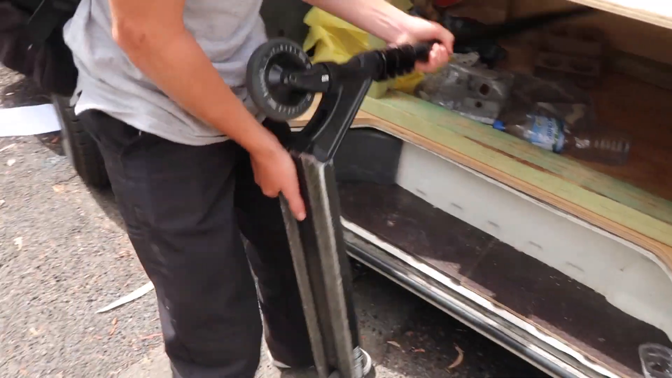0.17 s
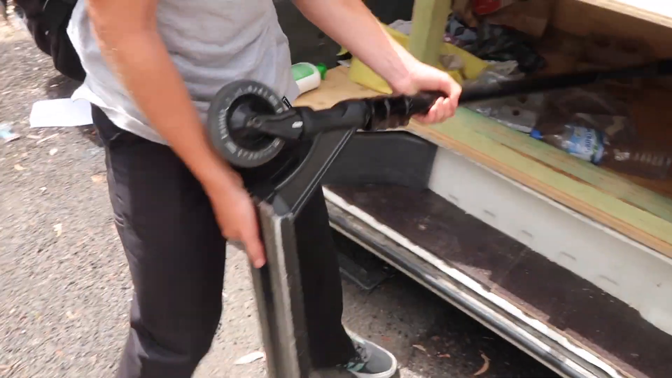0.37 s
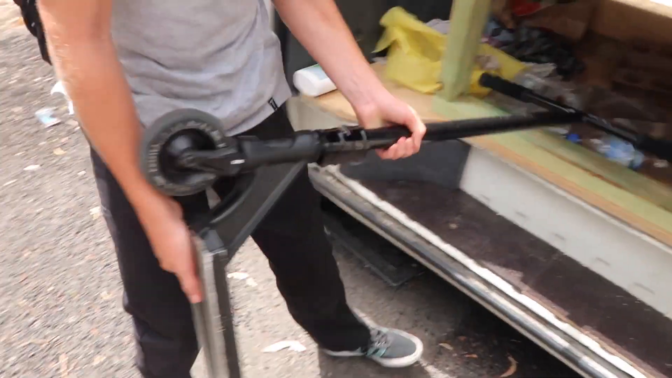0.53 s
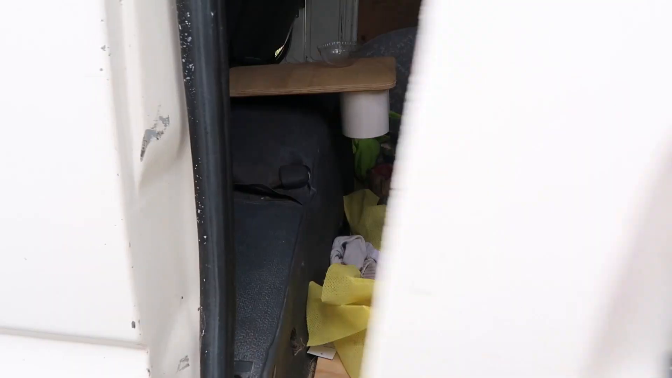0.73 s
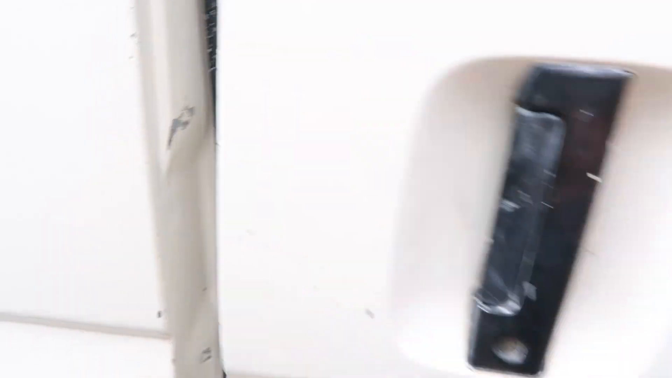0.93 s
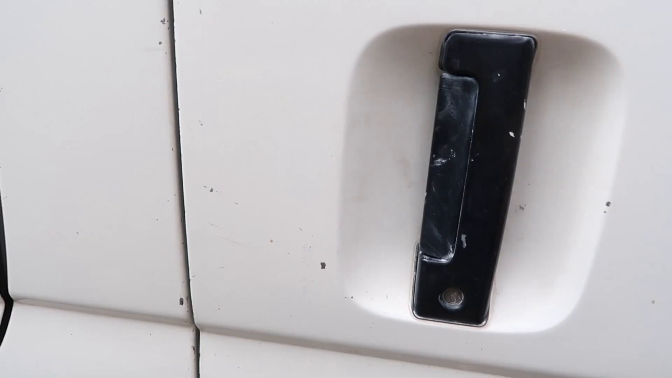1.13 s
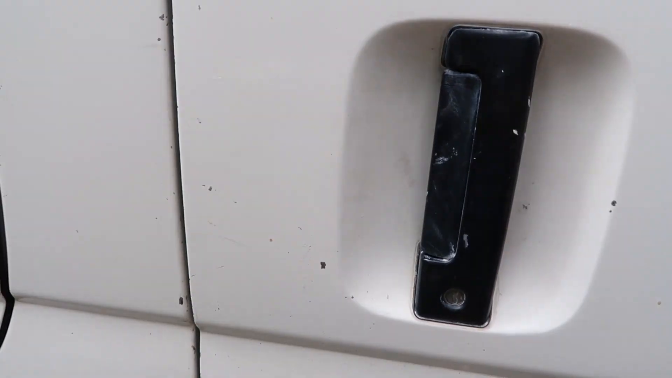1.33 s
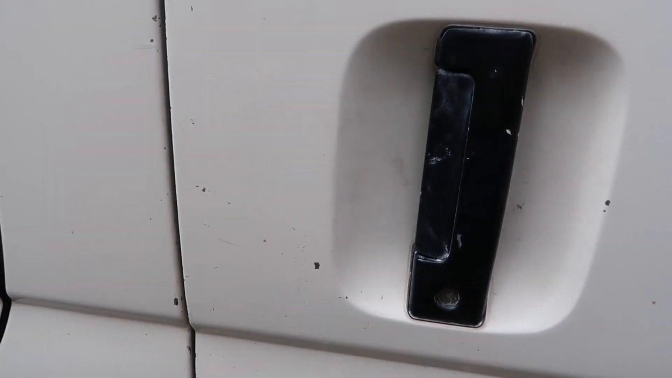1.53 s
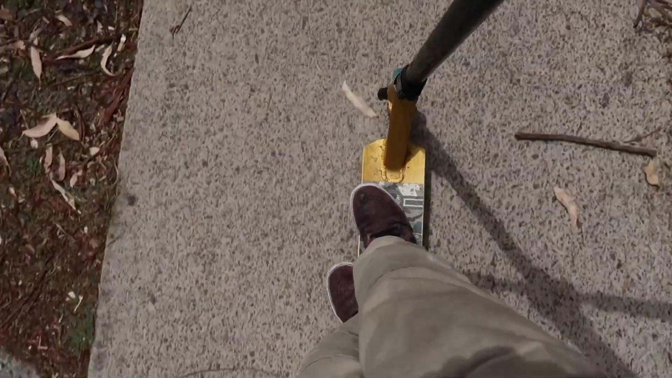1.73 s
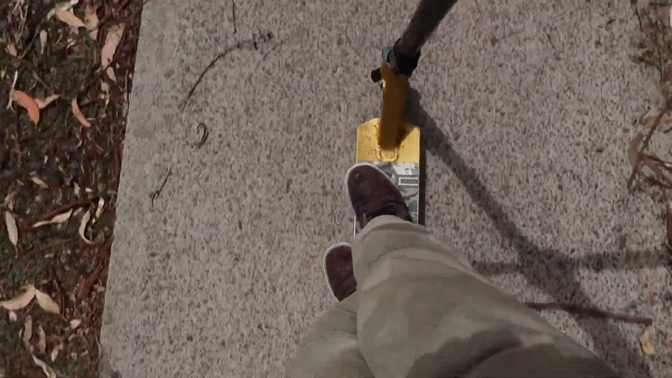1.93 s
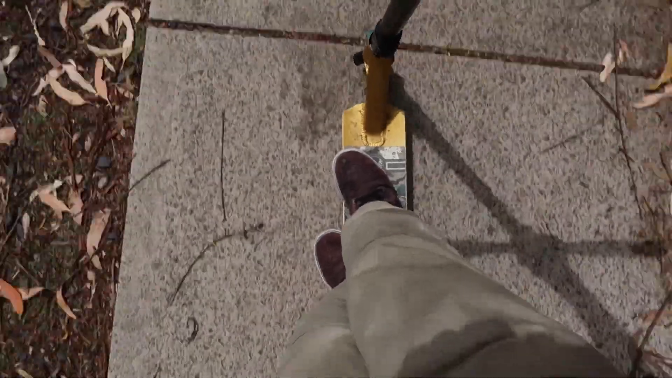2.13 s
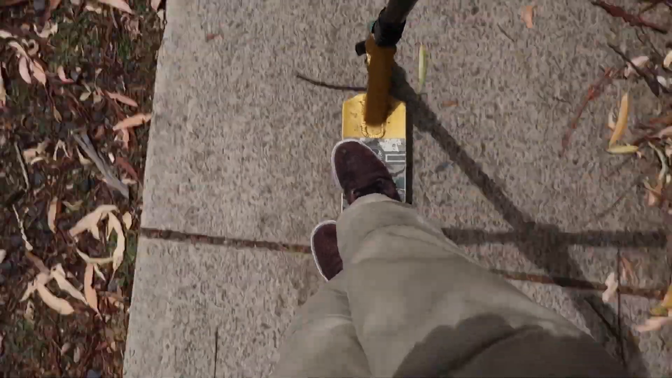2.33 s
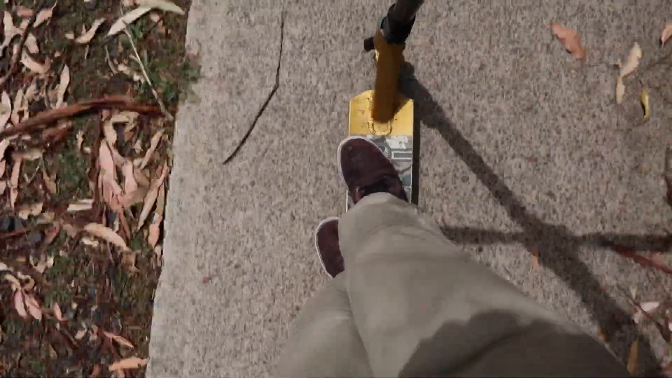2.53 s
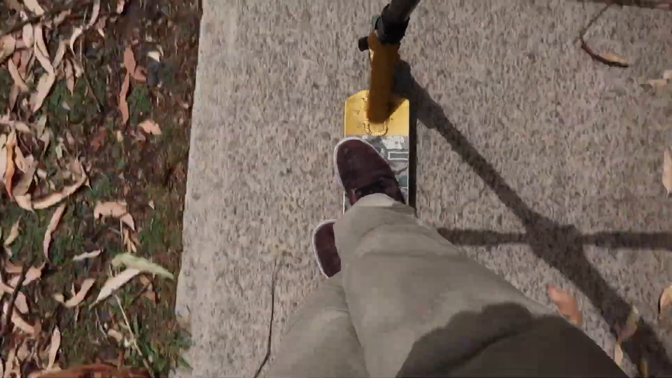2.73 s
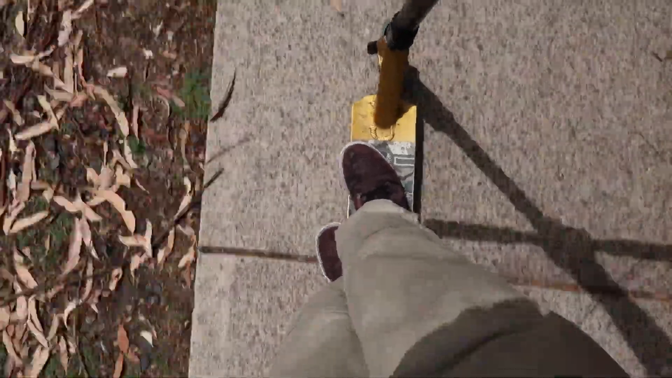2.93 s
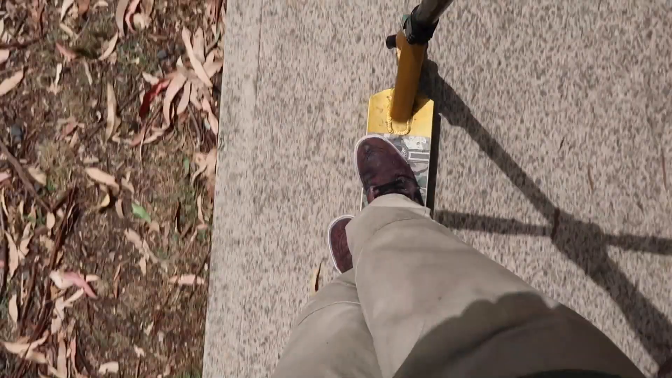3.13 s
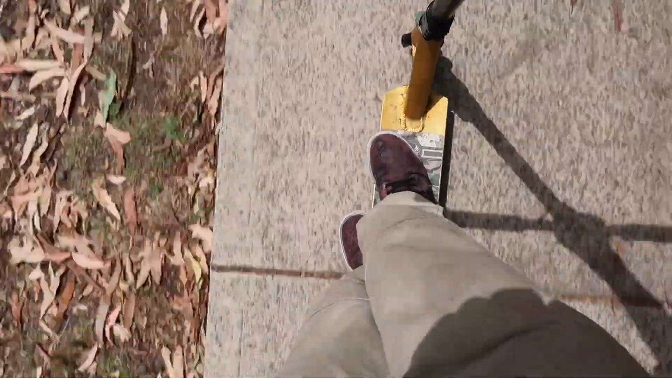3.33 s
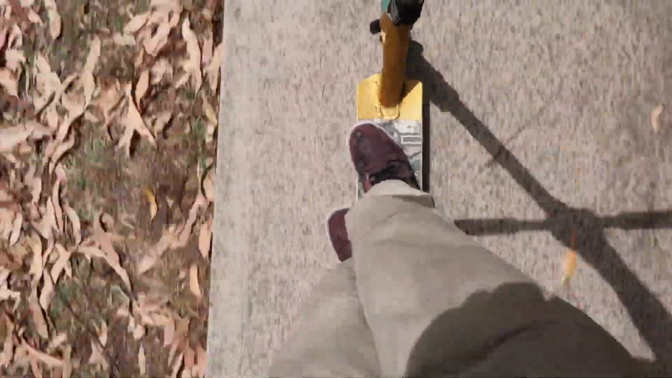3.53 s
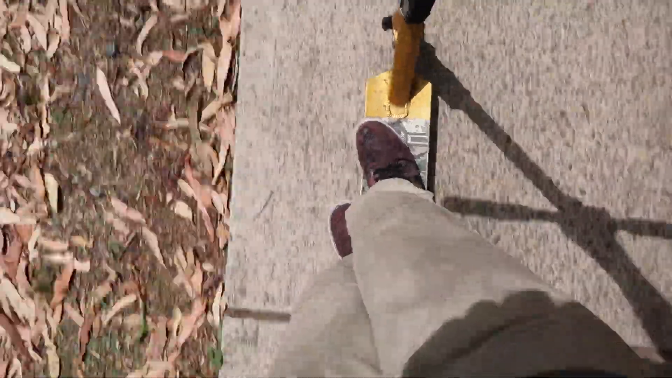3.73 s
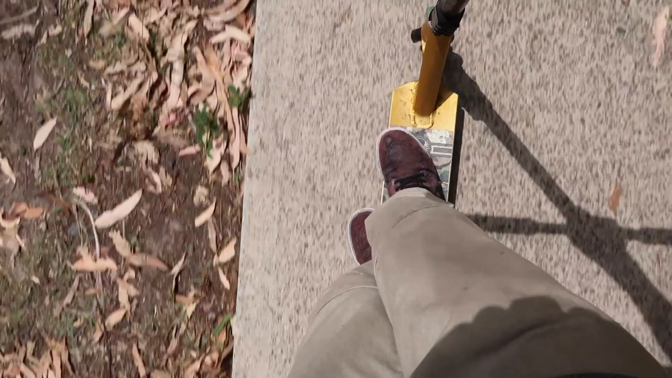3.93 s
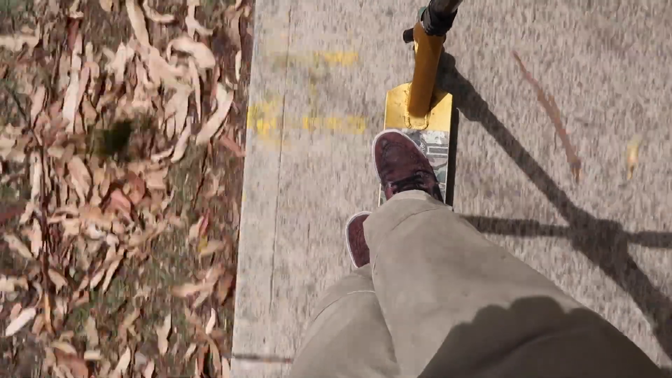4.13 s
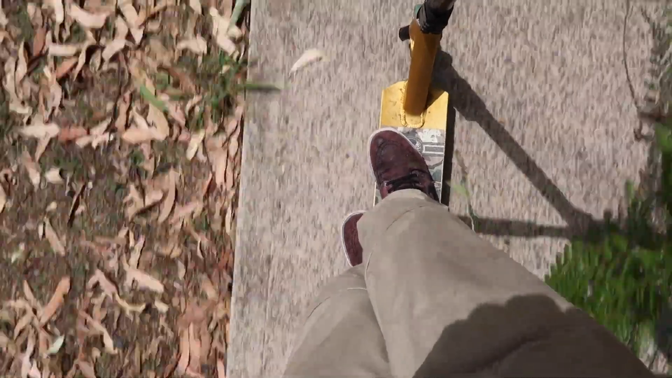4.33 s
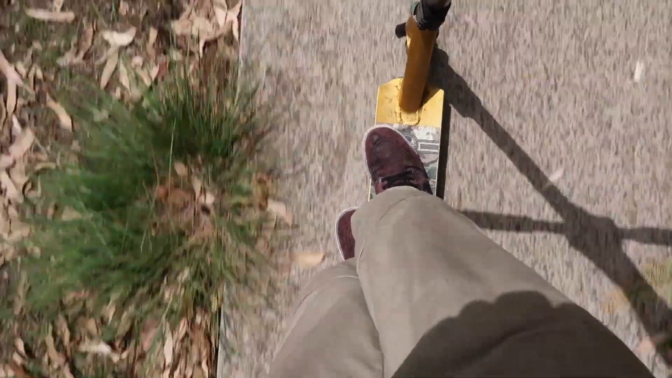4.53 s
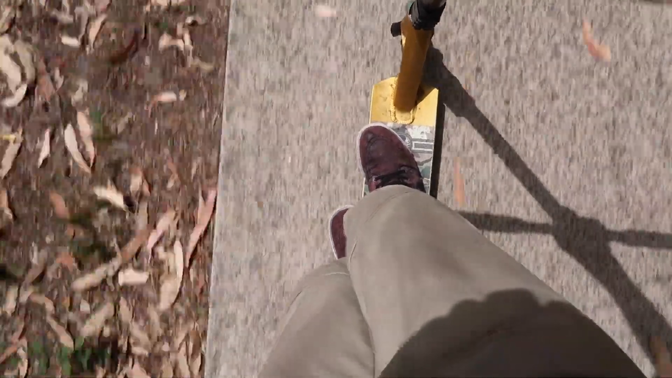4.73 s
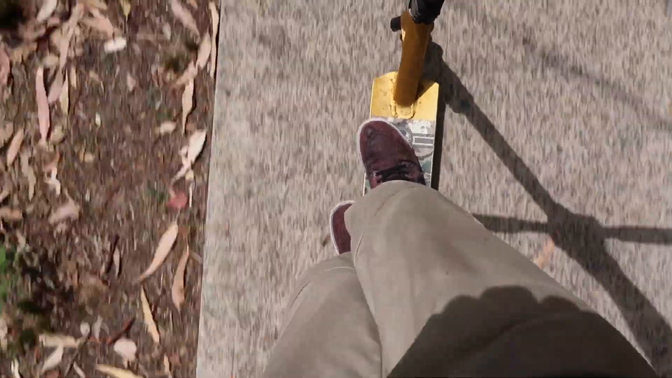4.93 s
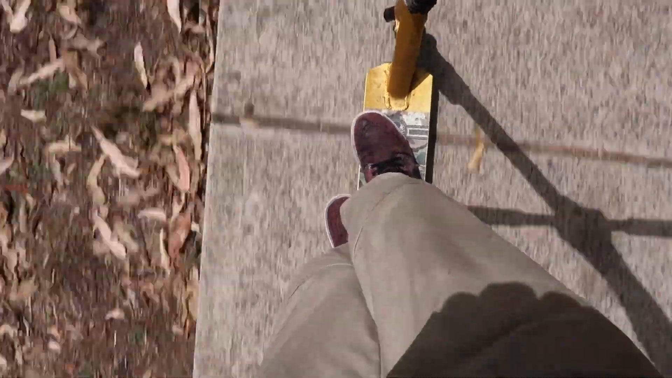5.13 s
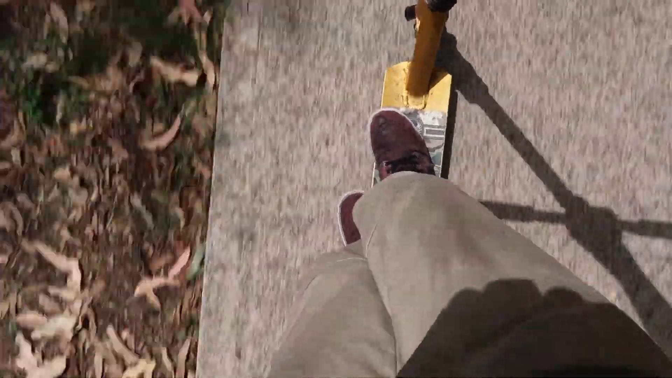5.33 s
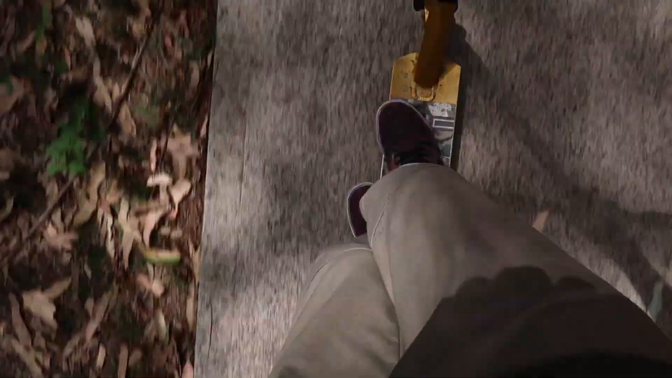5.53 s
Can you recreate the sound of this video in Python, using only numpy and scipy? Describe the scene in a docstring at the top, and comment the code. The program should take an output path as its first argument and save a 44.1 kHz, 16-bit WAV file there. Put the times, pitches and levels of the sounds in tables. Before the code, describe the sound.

Dull handling knocks lead to a quick metal clatter, then a heavy door grinds along its rail, crashes shut and rings briefly. A hard cut brings low, rattling wheel rumble on a path, with grit ticks, early juddering clacks, then spaced bassy thumps. Wind gusts and small motor ticks surround it; the close camera microphones overload slightly on big bumps.

```python
"""Outdoors, clothes rustle in a light breeze beside a ticking lens motor; a kick scooter lifted from a van clanks on it.
The van's sliding door rumbles and groans along its rail and slams: noise through body colours, with ringing modes.
Then the scooter rides down a concrete path: filtered noise drums and hisses, grains tick, pushes thump at the joints
and the deck clacks and judders. Shaking reaches the camera's two microphones through its body, headwind and gusts
buffet them, and the gain control ducks after the loudest peaks."""
import sys
import numpy as np
from scipy import signal
from scipy.fft import rfft, irfft, next_fast_len
from scipy.io import wavfile
from scipy.ndimage import uniform_filter1d

SR = 44100
rng = np.random.default_rng(int(sys.argv[2]) if len(sys.argv) > 2 else 0)


def dump_mix(stems):
    """Bounce the given channels to the path in sys.argv[1] as a 16-bit WAV at rate SR."""
    frames = np.atleast_2d(stems).T  # one column per channel
    limited = np.clip(frames, -1, 1)  # hard clip at full scale
    pcm = np.round(limited * 32767).astype(np.int16)
    wavfile.write(sys.argv[1], SR, pcm)


N = 249606
T = np.arange(N) / SR

# the door starts along its rail, reaches its end, and the ride begins (s)
DOOR_START, SHUT_S, RIDE_START = .725, 1.315, 1.648
# coarse grains, on the path and in the rail: rate, smallest size and spread, before filtering
STONES_PER_S, STONE_DB, STONE_SPREAD_DB = 68, -39, 4

# microphone pair hearing the shaken camera body: hz, left_minus_right_db, left_lead_rad, likeness_0_to_1
SHAKEN = [(40, -.3, 0, 1), (130, -3, -.1, .98), (185, -5.5, .1, .95), (275, -10, .9, .95),
          (410, -10, 1.55, .96), (570, -12.5, 3.3, .92), (710, -13, 3.4, .8), (900, -3.5, 3.3, .9),
          (1250, -3.5, 3.3, .88), (2330, 0, 3.1, .77), (4150, .5, 3.3, .45), (9100, 0, 3.1, .5)]
# the pair hearing airborne sound: hz, left_minus_right_db, left_lead_rad, likeness_0_to_1
AIRBORNE = [(170, 0, 0, 1), (275, -1, -.1, .99), (420, -3.5, -.3, .97), (620, -1, -1.2, .88),
            (1100, -1, -2.4, .85), (2500, 0, -3, .7), (9100, .5, -3.3, .55)]
# treble in the body pushes the pair in opposite directions: hz, left_minus_right_db, left_lead_rad, likeness_0_to_1
OPPOSED = [(1000, 0, np.pi, .88), (4000, 0, np.pi, .75), (9000, 0, np.pi, .7)]
# the ride gathers speed, then coasts: time_s, drumming_db, crunch_db (before the rough patches)
RIDE = [(1.66, -39, -64), (2.1, -31, -63), (2.66, -29.5, -62), (3.16, -26, -55), (4.11, -28, -64),
        (4.49, -30, -63.5), (5.11, -28.5, -60.5), (5.64, -30, -64)]
# resonances of deck, stem and camera body: hz, relative_db
FRAME = [(60, -28), (130, 2.5), (195, -10), (310, 1.5), (365, -5.5), (425, -2), (505, -17), (570, -6),
         (625, -12), (710, -8.5), (870, -27), (1060, -50), (2100, -54.5)]


def amp(db):
    """Decibels to gain."""
    return 10 ** (np.asarray(db) / 20)


def read(points, hz, axis=1):
    """One column of a table over log frequency."""
    points = np.array(points, float)
    return np.interp(np.log(hz + 1), np.log(points[:, 0] + 1), points[:, axis])


def level(curve, axis=1):
    """One dB column of a curve as a gain for every sample."""
    curve = np.array(curve)
    return amp(np.interp(T, curve[:, 0], curve[:, axis]))


def between(start, end):
    """One inside a stretch of time, with short fades."""
    fade_in = np.clip((T - start) * 200 + .5, 0, 1)
    return fade_in * np.clip((end - T) * 200 + .5, 0, 1)


def add(mix, s, sound):
    """Mixes a sound in at a time."""
    part = mix[:, max(round(s * SR), 0):][:, :sound.shape[-1]]
    part += sound[..., :part.shape[1]]


def dying(t, t60):
    """Falls by 60 dB in t60 seconds."""
    return np.exp(-np.log(1000) * t / t60)


def hump(s, half_s):
    """A smooth swell of height one around a time."""
    return np.exp(-np.minimum(((T - s) / half_s) ** 2, 50))


def held(start, end, rise_s, t60):
    """Rises at the start, holds until the end, then dies away."""
    return np.clip((T - start) / rise_s, 0, 1) * dying(np.maximum(T - end, 0), t60)


def wander(per_s):
    """Random drift: straight lines between normal draws of unit spread."""
    knots = rng.standard_normal(4096)
    return np.interp(T * per_s, np.arange(len(knots)), knots)


def colour(x, points, size=4096):
    """Minimum-phase filter of unit energy shaped by a table, rolled off above its last point."""
    hz = abs(np.fft.fftfreq(size, 1 / SR))
    rolloff = (1 + (hz / points[-1][0] / 2) ** 2) ** 2
    log_gain = np.log(amp(read(points, hz)) / rolloff + 1e-6)
    taps = np.fft.ifft(np.exp(np.conj(signal.hilbert(log_gain)))).real[:size // 2]
    return signal.oaconvolve(x, taps[None] / np.linalg.norm(taps), axes=1)[:, :N]


def ports(x, pair):
    """Row 0 reaches both microphones, shifted in level and phase; row 1 is the part that the left hears alone."""
    size = next_fast_len(N + 4096)
    hz, (shared, own) = np.fft.rfftfreq(size, 1 / SR), rfft(x, size)
    like = np.clip(read(pair, hz, axis=3), 0, 1)
    left = like * shared + np.sqrt(1 - like ** 2) * own
    left = left * amp(read(pair, hz)) * np.exp(1j * read(pair, hz, axis=2))
    return irfft(np.array([left, shared]), size)[:, :N]


def scattered(per_s, db, spread_db):
    """Impulses at random moments; a few are large."""
    size_db = db + spread_db * np.minimum(rng.exponential(1, (2, N)), 3)
    return amp(size_db) * (rng.random((2, N)) < per_s / SR)


def texture(points, pair, band, lumpy_db, per_s):
    """Countless tiny contacts as lumpy noise through a body; unit level within the band (Hz)."""
    contacts = rng.standard_normal((2, N)) * amp(lumpy_db * wander(per_s))
    x = ports(colour(contacts, points), pair)
    band_filter = signal.butter(4, band, "band", fs=SR, output="sos")
    return x / signal.sosfilt(band_filter, x.mean(0)).std()


def blows(rows, points, split_hz, rise_s, tail_db, tail_s):
    """Each blow is a swelling, dying burst of contacts plus a weak tail, with its own share of treble."""
    out, t = np.zeros((2, N)), T[:SR // 3]
    for s, db, treble_db, t60 in rows:
        swell = 1 - np.exp(-(t / rise_s) ** 2)
        decay = dying(t, t60) + amp(tail_db) * dying(t, tail_s)
        burst = rng.standard_normal((2, len(t))) * swell * decay
        low = signal.lfilter(*signal.butter(1, split_hz, fs=SR), burst)
        add(out, s - rise_s / 2, amp(db) * (low + amp(treble_db) * (burst - low)))
    return colour(out, points)


def strikes(rows, points):
    """Each contact is one clean impulse through a body; the level is its peak."""
    out = np.zeros((2, N))
    shape = colour(signal.unit_impulse((1, SR // 20)), points)
    for s, db, *_ in rows:
        add(out[:1], s, amp(db) * shape / abs(shape).max())
    return out


def ringing(rows, modes, scatter_db, buzz, detune):
    """Each blow rings the modes in freshly drawn shares and tunings; loose contact makes them buzz."""
    hz, mode_db, t60 = np.transpose(modes)[:, :, None]
    out, t = np.zeros((2, N)), T[:SR // 4]
    fade = amp(mode_db) * dying(t, t60) * (1 - np.exp(-t * hz))
    for s, db, *_ in rows:
        tuning = hz * (1 + detune * rng.standard_normal(hz.shape))
        shares = amp(db + scatter_db * rng.standard_normal((2, len(modes))))
        jitter = uniform_filter1d(rng.standard_normal(fade.shape), size=32, axis=1)
        slip = np.cumsum(jitter, 1) * np.sqrt(buzz * hz / SR)  # the phase drifts smoothly
        add(out, s, shares @ (fade * np.sin(2 * np.pi * tuning * t + slip)))
    return out


def wavering(hz, drift, lumpy_db, per_s):
    """A driven resonance of about unit level whose pitch and strength wander."""
    phase = 2 * np.pi * np.cumsum(hz * (1 + drift * wander(per_s))) / SR
    return np.sqrt(2) * np.sin(phase) * amp(lumpy_db * wander(per_s))


def unloading():
    """Clothes rustle as noise; the scooter knocks in bursts and its metal scrapes and rings on the van."""
    # outdoor air and rustling clothes: time_s, level_db
    yard = [(0.0, -59), (0.492, -62), (0.72, -63)]
    # their colour: hz, relative_db
    yard_colour = [(60, 4.5), (380, -7), (600, -10.5), (900, -9), (1500, -16.5), (2200, -19.5),
                   (2600, -24.5), (3300, -20), (3800, -27.5), (4600, -27.5), (5700, -33), (10000, -40.5),
                   (15000, -50)]
    # the scooter knocks in the hands: time_s, level_db (before the gains below), treble_db, decay_t60_s
    knock_rows = [(.209, -23, 4, 0.046), (.259, -19, -12, 0.062), (.458, -21, 5, 0.21),
                  (.476, -29, -5, 0.043), (.535, -21, 3, 0.13), (.553, -15, 5.5, 0.034)]
    # colour of the knocks: hz, relative_db
    knock_colour = [(80, -13.5), (200, -3), (400, 5), (560, -5), (750, -8.5), (1100, -15.5), (2500, -32),
                    (4300, -35.5), (7000, -66), (14000, -73.5)]
    # metal clatters on the van: time_s, level_db (before the gains below)
    clank_rows = [(.5545, -33.5), (.562, -23), (.5685, -24), (.572, -22.5), (.5795, -22.5), (.5845, -21.5),
                  (.5885, -22.5), (.599, -25.5), (.608, -28.5), (.617, -32.5), (.634, -37.5)]
    # modes of the scooter's metal: hz, relative_db, decay_t60_s
    metal = [(428, -1, .09), (738, 1, .11), (1066, -3, .1), (1427, 1, .1), (1529, -1, .11), (1627, -3, .1),
             (2094, -5, .1), (2194, -9, .1), (2444, -14, .1), (2998, -11, .11), (3461, -14, .13),
             (3760, -14, .12), (3930, -11, .09), (4475, -21, .08), (4915, -20, .08), (5250, -20, .07)]
    # colour of the scraping: hz, relative_db
    clank_colour = [(120, -22.5), (450, -0.5), (700, -5), (1500, -12.5), (2400, -10), (4000, -16.5),
                    (5200, -29), (6500, -28.5), (7500, -64), (14000, -68)]
    air = texture(yard_colour, SHAKEN, (2500, 6000), lumpy_db=2.5, per_s=70)
    air = air * level(yard) * between(-1, DOOR_START)
    knocks = amp(-5.5) * blows(knock_rows, knock_colour, split_hz=370, rise_s=.002, tail_db=-8, tail_s=0.28)
    knocks += amp(3.5) * strikes(knock_rows, knock_colour)
    scrape_rows = [(s, db, 0, .018) for s, db in clank_rows]
    scrape = blows(scrape_rows, clank_colour, split_hz=1500, rise_s=.0006, tail_db=-15, tail_s=0.11)
    ring = ringing(clank_rows, metal, scatter_db=2.5, buzz=.1, detune=.006)
    clanks = amp(1.5) * scrape + amp(-2.5) * strikes(clank_rows, clank_colour) + amp(-5.5) * ring
    return air + ports(knocks, SHAKEN) + ports(clanks, AIRBORNE)


def wind():
    """Low, lumpy buffeting on the microphones: breeze, easing headwind and low swells add in power."""
    # colour of the buffeting: hz, relative_db
    wind_colour = [(12, -37), (26, -22.5), (42, 0), (70, -4), (110, -4), (200, -14), (500, -53.5)]
    # the microphone pair in the wind: hz, left_minus_right_db, left_lead_rad, likeness_0_to_1
    windward = [(30, 0, 0, 1), (150, -1.5, 0, .97)]
    # gusts, the door's puff, and a low handling thud at .448 s: top_s, level_db, half_length_s
    swells = [(.448, -31, .025), (1.285, -29.5, 0.036), (2.25, -23.5, 0.18), (2.568, -27, .065),
              (2.73, -32, 0.046), (2.957, -24.5, 0.042), (3.364, -30, 0.026), (3.718, -36.5, 0.062),
              (4.51, -30, 0.15), (5.22, -28.5, .04)]
    breeze_db, headwind_db, headwind_db_per_s = -43.5, -32, -3  # headwind as the ride begins, then its change
    headwind = amp(headwind_db + headwind_db_per_s * (T - RIDE_START)) * between(RIDE_START, np.inf)
    swell_power = sum((amp(db) * hump(s, half_s)) ** 2 for s, db, half_s in swells)
    power = amp(breeze_db) ** 2 + headwind ** 2 + swell_power
    return texture(wind_colour, windward, (25, 100), lumpy_db=1.5, per_s=18) * np.sqrt(power)


def lens():
    """The lens motor works in even steps, each a burr of weakening gear contacts, with single ticks besides."""
    # runs of motor steps: first_step_s, step_count, level_db (before the gains below), change_db_per_s
    step_runs = [(0.014, 13, -46, -7), (2.915, 5, -41.5, -4), (3.156, 5, -40.5, -14),
                 (3.395, 3, -43.5, -24), (3.555, 2, -52, -64), (3.635, 1, -45, -1), (3.675, 2, -41.5, -20),
                 (3.796, 2, -42, 4), (3.876, 3, -49, 5.5)]
    # single motor ticks, some on the even steps, some between: time_s, level_db (before the gains below)
    single_ticks = [(.272, -37.5), (.458, -44), (.516, -32.5), (2.914, -31.5), (2.953, -39), (3.008, -45),
                    (3.046, -34.5), (3.099, -39), (3.169, -38), (3.3145, -47.5), (3.338, -44.5),
                    (3.737, -43), (3.804, -39), (3.836, -52), (3.956, -41.5), (4.588, -53), (4.834, -47.5)]
    # colour of the gear contacts: hz, relative_db
    burr_colour = [(700, -9), (1300, 0.5), (1900, -4.5), (2700, -8.5), (3100, -1), (3380, 6), (3720, -12.5),
                   (4080, 7), (4480, -9), (5050, -8.5), (5800, -31), (12000, -36)]
    # the gears' own tones: hz, relative_db, decay_t60_s
    gears = [(3310, -11.5, 0.11), (3760, -18.5, 0.05), (3983, 1, 0.06), (4700, -18.5, 0.04)]
    step_s, contact_count = .04, 4
    gap_s, gap_jitter, contact_db_per_s, contact_scatter_db = .0045, .15, -350, 3
    hits = list(single_ticks)
    for first, count, db, db_per_s in step_runs:
        for s in first + step_s * np.arange(round(count)):
            late, strength = rng.standard_normal((2, contact_count))
            after = np.arange(contact_count) * gap_s * (1 + gap_jitter * late)
            step_db = db + db_per_s * (s - first)
            levels = step_db + contact_db_per_s * after + contact_scatter_db * strength
            hits += zip(s + after, levels)
    burr_rows = [(s, db, 0, .02) for s, db in hits]
    burr = blows(burr_rows, burr_colour, split_hz=2000, rise_s=.001, tail_db=-26, tail_s=0.06)
    tones = ringing(hits, gears, scatter_db=2, buzz=.15, detune=.02)
    return ports(amp(7) * burr + amp(-5) * tones, OPPOSED)


def sliding():
    """Rollers rumble as noise, groan as a wavering tone, grind and scrape; the van's hollow body booms."""
    # colour of the rollers on their rail: hz, relative_db
    door_colour = [(80, -27.5), (170, -3.5), (230, -2.5), (310, 1.5), (415, -1.5), (480, 1), (540, -16),
                   (640, -20), (800, -13.5), (1000, -24), (1600, -31), (3000, -57.5)]
    # groan along the rail, grinding in its bend: time_s, groan_db, groan_pitch_hz (before drift), grinding_db
    rail = [(.73, -34.5, 380.3, -54), (.77, -32, 398, -49), (0.807, -22.5, 409.3, -60),
            (0.829, -32, 431.7, -47), (.94, -36, 431.2, -63), (.97, -35, 411.6, -38),
            (1.024, -27.5, 420.1, -35.5), (1.09, -39.5, 360.8, -38.5), (1.148, -30, 422.4, -48),
            (1.18, -41, 443.5, -45), (1.25, -28, 429.3, -39.5), (1.401, -37.5, 398.4, -55),
            (1.5, -62, 388, -58)]
    # colour of the grinding: hz, relative_db
    grind_colour = [(400, -26), (540, -4.5), (630, 8), (700, 0), (770, 4.5), (900, -17.5), (1100, -13.5),
                    (1400, -14), (1800, -23), (3000, -41)]
    # colour of the scraping: hz, relative_db
    scrape_colour = [(700, 0), (1300, 0.5), (2400, -6), (4300, -11), (6000, -18), (10000, -27),
                     (15000, -36)]
    # jolts of body and rollers: time_s, boom_db, rumble_db (both before the gains below), boom_t60_s
    jolts = [(0.728, -24.5, -41, 3.3), (1.071, -32, -41, 1.35), (1.537, -29, -31.5, 4)]
    rise_s, jolt_rumble_t60_s, boom_hz = 0.0076, 0.28, 126.2
    roll_db, roll_t60_s = -29.5, 0.99  # before the gain below
    scrape_db, scrape_t60_s, air_db = -59.5, 0.14, -62
    travel = amp(roll_db) * held(DOOR_START, SHUT_S, rise_s, roll_t60_s)
    jolted = sum(amp(db) * held(s, s, rise_s, jolt_rumble_t60_s) for s, _, db, _ in jolts)
    booming = sum(amp(db) * held(s, s, rise_s, t60) for s, db, _, t60 in jolts)
    scraping = np.hypot(amp(scrape_db) * held(DOOR_START, SHUT_S, rise_s, scrape_t60_s), amp(air_db))
    rollers = texture(door_colour, AIRBORNE, (180, 330), lumpy_db=2.5, per_s=80)
    rollers = amp(-3.0) * np.hypot(travel, jolted) * rollers
    s, _, groan_hz, _ = np.transpose(rail)
    groan = wavering(np.interp(T, s, groan_hz), drift=0.0394, lumpy_db=5, per_s=90) * level(rail)
    grind = texture(grind_colour, AIRBORNE, (550, 850), lumpy_db=-0.5, per_s=61) * level(rail, axis=3)
    boom_phase = 2 * np.pi * np.cumsum(boom_hz * (1 + 0.022 * wander(25.1))) / SR
    boom = amp(1.5) * np.sin(boom_phase) * booming
    scrape = texture(scrape_colour, AIRBORNE, (1500, 6000), lumpy_db=1.5, per_s=36) * scraping
    travelling = rollers + grind + boom + scrape + ports(np.array([groan, groan]), AIRBORNE)
    return travelling * between(DOOR_START, RIDE_START)


def rail_grit():
    """Coarse grains crack in the door's rail: scattered impulses through its colour."""
    # colour of the cracking grit: hz, relative_db
    grit_colour = [(600, -6), (1100, -11.5), (1380, 7), (1800, -5.5), (2150, 1.5), (2700, -7), (3900, -6.5),
                   (6000, -25.5), (10000, -34)]
    grains = scattered(STONES_PER_S, STONE_DB, STONE_SPREAD_DB) * between(DOOR_START, SHUT_S)
    return amp(10) * ports(colour(grains, grit_colour), AIRBORNE)  # louder than grains on the path


def slamming():
    """Blows crash and ring the door panel; the runner rattles, the shell shudders and the latch clicks."""
    # the latch and handle click: time_s, level_db, treble_db, decay_t60_s
    latch_rows = [(.736, -20, -7.5, 0.082), (0.7464, -10, -3.5, 0.025), (.757, -27, -11.5, 0.037),
                  (.983, -16.5, -1.5, 0.01), (1.511, -39, 9.5, 0.12), (1.539, -44.5, 16, 0.039),
                  (1.546, -27, 10, 0.024), (1.556, -45, 17.5, 0.048), (1.569, -25.5, 14.5, 0.016),
                  (1.586, -32.5, 9, 0.035)]
    # colour of the latch: hz, relative_db
    latch_colour = [(100, -10.5), (400, 8.5), (700, -11.5), (1500, -6), (2300, -13), (3500, -8.5),
                    (5500, -20), (9000, -25.5), (13000, -37), (16000, -47)]
    # the loose runner rattles in the rail: time_s, level_db
    rattles = [(.738, -21), (.7465, -15), (.79, -35.5), (.817, -38), (.962, -37.5), (.98, -33),
               (1.011, -33), (1.037, -45), (1.094, -45), (1.13, -33.5), (1.154, -41), (1.186, -32.5)]
    # modes of the runner: hz, relative_db, decay_t60_s
    runner_modes = [(1020, 0.5, 0.025), (1280, -1, 0.041), (1376, -1, .06), (1700, -2, 0.033),
                    (2140, -12, 0.056), (2430, -17, 0.033), (3180, -17.5, 0.056), (3880, -22, .04)]
    # the catch knocks the panel: time_s, peak_db
    catches = [(.7478, -12.5), (1.2172, -10), (1.511, -21), (1.546, -20), (1.569, -29), (1.586, -18)]
    # colour of the catch: hz, relative_db
    catch_colour = [(100, -4.5), (250, 3), (430, 2), (650, -17.5), (1400, -21.5), (3500, -24), (6500, -31),
                    (9000, -42), (15000, -60)]
    # blows on the door: time_s, level_db (before the gains below), treble_db, decay_t60_s
    slam_rows = [(.8, -29, 3.5, .09), (.843, -27, -12, .03), (.861, -22, -12, .03), (.873, -24, -12, .03),
                 (.953, -18, -18, .06), (1.013, -22, -8, .04), (1.04, -25, -10, .04), (1.11, -27, -10, .04),
                 (1.146, -26, -5, .05), (1.183, -26, 7, .2), (1.204, -26, 11, .05), (1.2165, -7.5, 1, .05),
                 (1.226, -24, 3, .045), (1.239, -25, 1, .044), (1.256, -22, 4, .06)]
    # modes of the door panel: hz, relative_db, decay_t60_s
    panel_modes = [(189, -14, 0.26), (230.8, -10, 0.34), (283.4, -6.5, 0.098), (399, -10.5, 0.23),
                   (443, -1, 0.15), (469, 1.5, 0.047), (570, -17, 0.13), (649, -14.5, 0.12),
                   (880, -20, 0.3), (1230, -26.5, .22), (1510, -27.5, .11), (2430, -32.5, 0.19),
                   (3660, -29, .08)]
    # colour of the crash: hz, relative_db
    slam_colour = [(60, -30.5), (250, 4), (450, 3), (700, -11.5), (1200, -7.5), (2000, -17), (3000, -21.5),
                   (4500, -18.5), (6800, -29), (8000, -67), (14000, -56)]
    # the van's shell shudders after the slam: time_s, level_db (before the gain below)
    shudders = [(1.262, -25.5), (1.285, -22.5), (1.318, -22), (1.346, -27), (1.388, -27.5), (1.425, -33)]
    # modes of the shell: hz, relative_db, decay_t60_s
    shell_modes = [(148, -3, 0.23), (198, 2.5, 0.16), (250.6, 1.5, 0.11), (306, 6, 0.042)]
    slams = amp(-1.5) * blows(slam_rows, slam_colour, split_hz=850, rise_s=0.002, tail_db=-22.5, tail_s=0.25)
    panel = amp(-0.5) * ringing(slam_rows, panel_modes, scatter_db=1.5, buzz=.02, detune=.005)
    runner = ringing(rattles, runner_modes, scatter_db=2.5, buzz=.08, detune=.012)
    shell = amp(0.5) * ringing(shudders, shell_modes, scatter_db=-3.5, buzz=0.21, detune=.04)
    latch = blows(latch_rows, latch_colour, split_hz=2500, rise_s=0.0039, tail_db=-16.5, tail_s=0.15)
    latch += strikes(catches, catch_colour)
    return ports(slams + panel + runner + shell + latch, AIRBORNE)


def rolling():
    """The concrete's grain shakes the frame and crunches, more on rough patches; steady hiss and grit lie above it."""
    # colour of the crunching grain: hz, relative_db
    crunch_colour = [(600, -10), (950, -3.5), (1070, -1), (1270, 11), (1550, -4.5), (2000, -21),
                     (3000, -37)]
    # colour of a steady mid-treble hiss, probably the camera's stabiliser: hz, relative_db
    stabiliser_colour = [(900, 12.5), (1600, -0.5), (2100, -2), (2450, -4.5), (2750, -6.5), (3130, -2),
                         (3380, 0), (3500, 4.5), (3620, -5), (3850, -4), (4080, -7.5), (4380, -6.5),
                         (4485, 6), (4560, -7), (4640, 0.5), (4740, 1), (4870, 3), (5150, -5), (5700, -7),
                         (8000, -29.5)]
    # colour of the fine grit: hz, relative_db
    grit_colour = [(3000, -17.5), (5800, -1), (8200, 3), (9500, -3.5), (12500, -5.5), (13000, -19.5),
                   (13400, -21), (15000, -23.5)]
    # hiss along the path: time_s, stabiliser_db, grit_db (before the gains below)
    hiss_curve = [(1.66, -58.5, -71), (2.2, -57.5, -70.5), (2.75, -60.5, -72), (3.08, -57, -72),
                  (3.73, -61, -80.5), (4.6, -66, -81.5), (5.64, -66.5, -82)]
    patches = wander(13)
    drum = texture(FRAME, SHAKEN, (150, 900), lumpy_db=1.5, per_s=110)
    drum = amp(0.68 + 1.0 * patches) * drum * level(RIDE)
    crunch = texture(crunch_colour, SHAKEN, (1050, 1600), lumpy_db=3.5, per_s=240)
    crunch = amp(0.84 * patches) * crunch * level(RIDE, axis=2)
    hiss = texture(stabiliser_colour, SHAKEN, (2800, 5500), lumpy_db=1.5, per_s=200)
    hiss = amp(-0.5) * hiss * level(hiss_curve)
    grit = texture(grit_colour, OPPOSED, (6500, 12000), lumpy_db=-0.5, per_s=33)
    grit = amp(-3.5) * grit * level(hiss_curve, axis=2)
    return (drum + crunch + hiss + grit) * between(RIDE_START, np.inf)


def stones():
    """Impulses through body colours: grains tick under the wheels, pits jog the frame, the drumming peaks."""
    # colour of the ticking grains: hz, relative_db
    stone_colour = [(400, -6), (720, 4.5), (950, 0.5), (1270, -2.5), (1700, -10.5), (2600, -7), (3450, 2),
                    (4000, -12.5), (4800, -9.5), (6000, -22), (10000, -32.5)]
    # louder moments of the rolling drumming: time_s, peak_db
    drum_peaks = [(2.606, -14), (2.976, -14), (3.497, -11.5), (3.686, -17), (4.139, -20.5), (4.484, -16),
                  (4.6, -10.5), (4.788, -14), (5.102, -16.5), (5.276, -12)]
    # their colour: hz, relative_db
    drum_peak_colour = [(120, -10), (310, -3), (430, 3.5), (510, -11), (580, -3), (740, -6.5), (950, -29),
                        (2500, -48)]
    pits_per_s, pit_db, pit_spread_db = 40, -6.5, 4  # smallest size where the drumming is loudest
    riding = between(RIDE_START, np.inf)
    ticks = colour(scattered(STONES_PER_S, STONE_DB, STONE_SPREAD_DB) * riding, stone_colour)
    pits = scattered(pits_per_s, pit_db, pit_spread_db) * riding
    jogs = colour(pits * level(RIDE) / level(RIDE).max(), FRAME)
    return ports(ticks + jogs + strikes(drum_peaks, drum_peak_colour), SHAKEN)


def deck():
    """The deck clacks as the rider steps on, and judders under the shifting weight as swelling low tones."""
    # clacks underfoot: time_s, level_db (before the gains below), treble_db, decay_t60_s
    clack_rows = [(2.051, -11.5, -22, 0.071), (2.069, -20, 2.5, 0.049), (2.404, -19, -5, 0.046),
                  (2.42, -19, 4, 0.069), (2.684, -9, -8, 0.068), (2.708, -10, -6.5, 0.099)]
    # colour of the clacks: hz, relative_db
    clack_colour = [(90, 2), (300, 11), (560, -9.5), (740, 6), (900, -17), (1050, -20), (1300, -13),
                    (1700, -33), (2700, -31), (3400, -31), (7000, -55.5), (14000, -61)]
    # the deck judders: top_s, level_db, half_length_s, pitch_hz (before drift)
    judders = [(2.204, -22.5, 0.049, 63), (2.328, -19, 0.026, 58.2), (2.447, -17.5, 0.024, 54.7),
               (2.502, -17.5, 0.019, 59), (2.95, -23, 0.062, 103), (3.738, -29, 0.18, 95.7)]
    overtone_db = -9.5
    clacks = amp(-0.5) * blows(clack_rows, clack_colour, split_hz=3100, rise_s=0.0012, tail_db=-24.0, tail_s=0.11)
    clacks += amp(1.5) * strikes(clack_rows, clack_colour)
    judder = np.zeros(N)
    for s, db, half_s, hz in judders:
        sway = wavering(hz, drift=0.0628, lumpy_db=1, per_s=40)
        overtone = wavering(2 * hz, drift=0.0798, lumpy_db=3.5, per_s=50)
        judder += amp(db) * hump(s, half_s) * (sway + amp(overtone_db) * overtone)
    return ports(clacks, SHAKEN) + judder


def joints():
    """Each joint or low thump is a lopsided pressure push; the frame rings, the deck flexes and a click follows suit."""
    # pushes at joints and bumps, and low thumps of wind or foot: time_s, push_db (at its centre), push_pitch_hz
    push_rows = [(2.29, -5, 98.5), (2.477, -6, 81.5), (2.56, -0.5, 238.5), (2.926, -12.5, 108.7),
                 (3.137, -1, 193.5), (3.3304, -4, 138), (3.516, 2.5, 244.6), (3.731, -14, 104.6),
                 (3.886, 3.5, 260), (4.268, 0, 270), (4.6312, -0.5, 291), (5.016, -0.5, 312),
                 (5.35, 0.5, 280), (5.53, -15, 170), (5.6462, 1.5, 292)]
    # colour of a push's click: hz, relative_db
    click_colour = [(200, -16), (600, -10), (1000, 5.5), (1350, -5), (1800, -6), (2200, -14), (2800, -13.5),
                    (4000, -20.5), (6000, -35), (12000, -50)]
    push_skew = 0.3  # lopsidedness: a wheel drops into a joint harder than it climbs out
    flex_hz, flex_db, flex_t60_s = 100, -18.5, 0.092  # level against the push
    # click against the push at sharp_hz, before the gains below; higher-pitched pushes click louder
    click_db, click_db_per_octave, sharp_hz = -27.5, 11.5, 272
    push, flex, t = np.zeros((2, N)), np.zeros((2, N)), T[:SR // 10]
    edges = []
    for s, db, hz in push_rows:
        u = np.pi * hz * (t - 1 / 20)
        pulse = (2 * u ** 2 - 1 - push_skew * u) * np.exp(-u ** 2)
        add(push[:1], s - 1 / 20, amp(db) * pulse)
        swing = np.sin(2 * np.pi * flex_hz * t) * dying(t, flex_t60_s)
        add(flex[:1], s, amp(db + flex_db) * swing)
        edges.append((s, db + click_db + click_db_per_octave * np.log2(hz / sharp_hz)))
    clicks = amp(4.5) * strikes([(s - .001, db) for s, db in edges], click_colour)
    chip_rows = [(s - .003, db, 0, .025) for s, db in edges]
    chips = amp(1.5) * blows(chip_rows, click_colour, split_hz=2000, rise_s=0.0034, tail_db=-25, tail_s=0.13)
    frame_ring = amp(-37.0) * colour(push, FRAME)
    return ports(push + flex + frame_ring + clicks + chips, SHAKEN)


def scene():
    """All sources at the two microphones."""
    standing = unloading() + wind() + lens()  # wind and lens carry on through the ride
    door = sliding() + rail_grit() + slamming()
    ride = rolling() + stones() + deck() + joints()
    return standing + door + ride


def record(dry):
    """Gain control ducks after loud peaks, too late for the thumps, which are rounded off; then the band limit."""
    threshold_db, duck_share, attack_s, recover_db_per_s = -4.5, 0.82, 0.03, 30.5
    edge_hz = 15100
    peak_db, recovery = 20 * np.log10(abs(dry).max(0) + 1e-9), T * recover_db_per_s
    falling_peak_db = np.maximum.accumulate(peak_db + recovery) - recovery
    over_db = np.maximum(falling_peak_db - threshold_db, 0)
    keep = np.exp(-1 / (attack_s * SR))
    ducked = dry / amp(duck_share * signal.lfilter([1 - keep], [1, -keep], over_db))
    rounded = ducked / (1 + (ducked / 1.1) ** 6) ** (1 / 6)
    band_limit = signal.firwin(511, edge_hz, window=("kaiser", 9), fs=SR)
    return signal.oaconvolve(rounded, band_limit[None], "same")


dry = scene()
out = record(dry)
dump_mix(out)
```